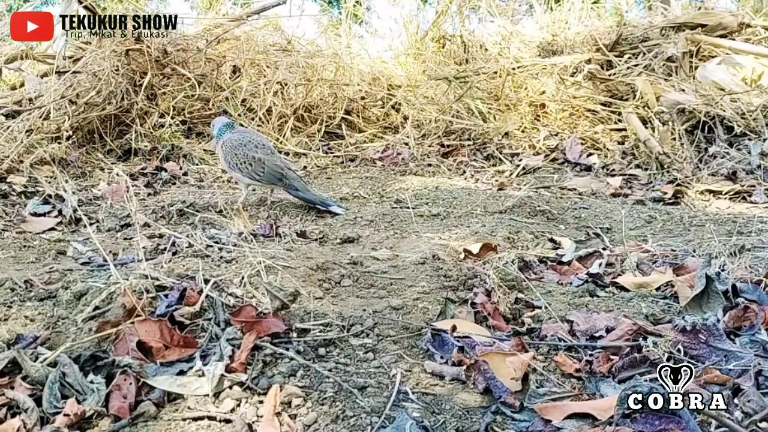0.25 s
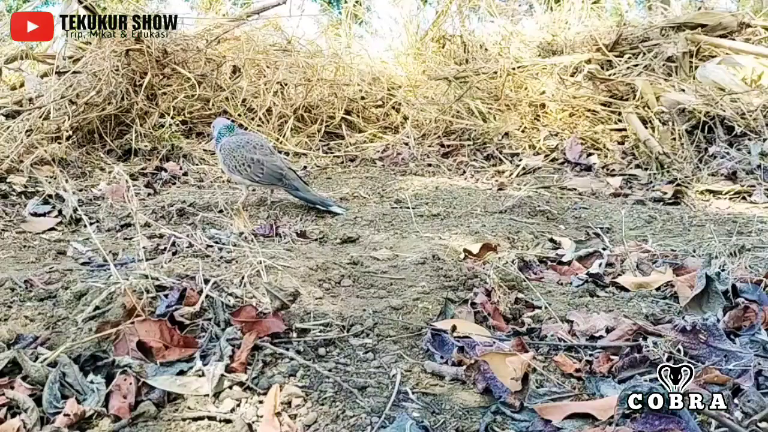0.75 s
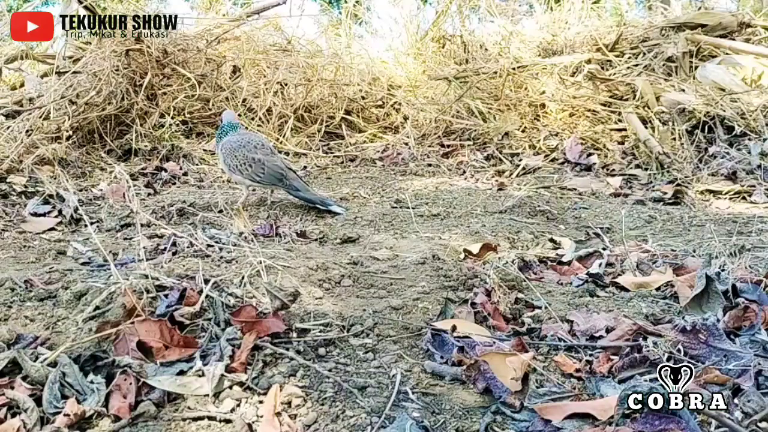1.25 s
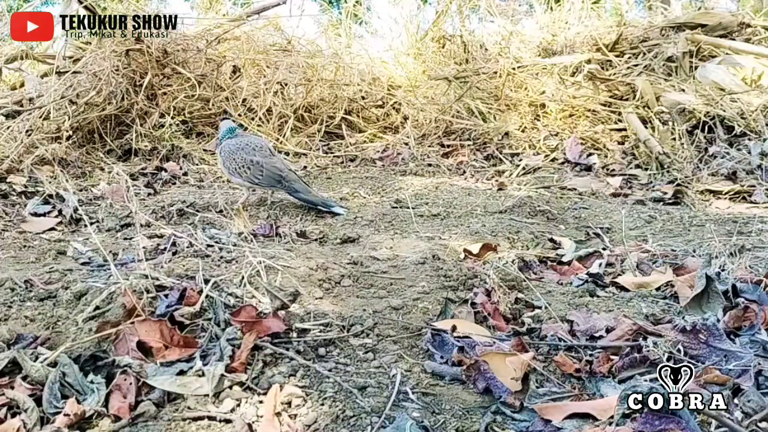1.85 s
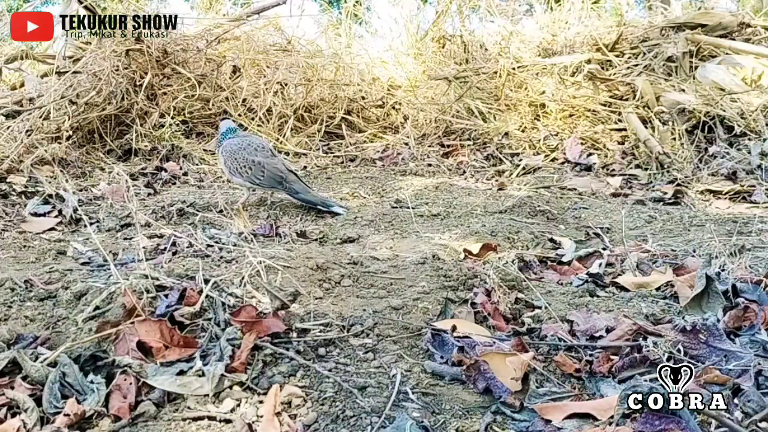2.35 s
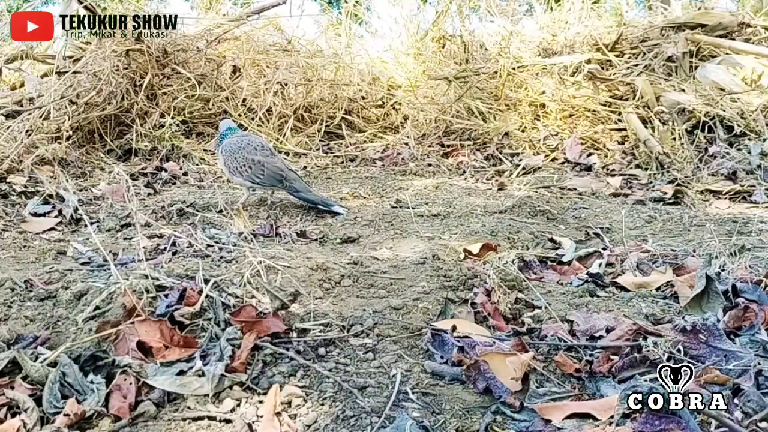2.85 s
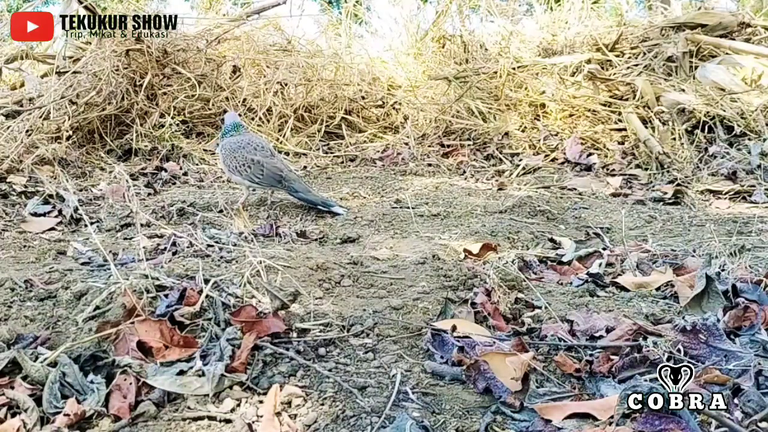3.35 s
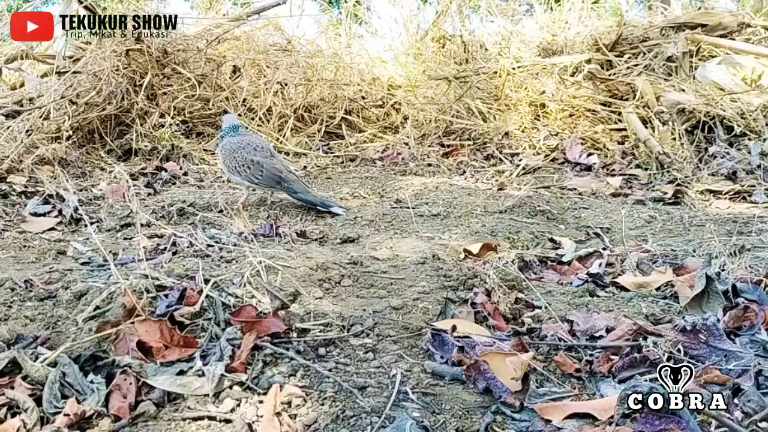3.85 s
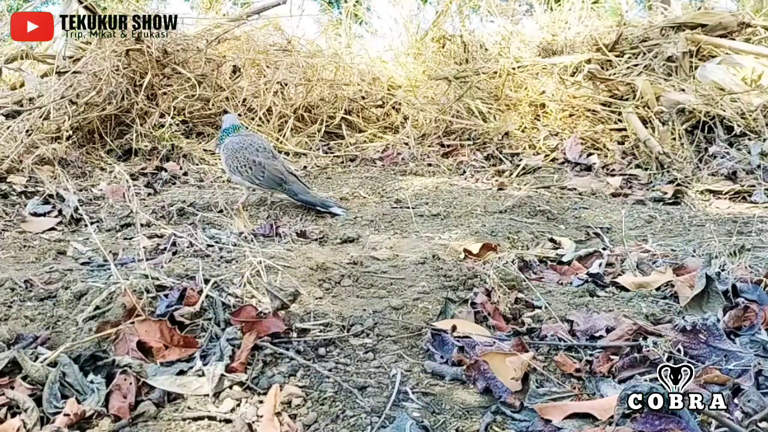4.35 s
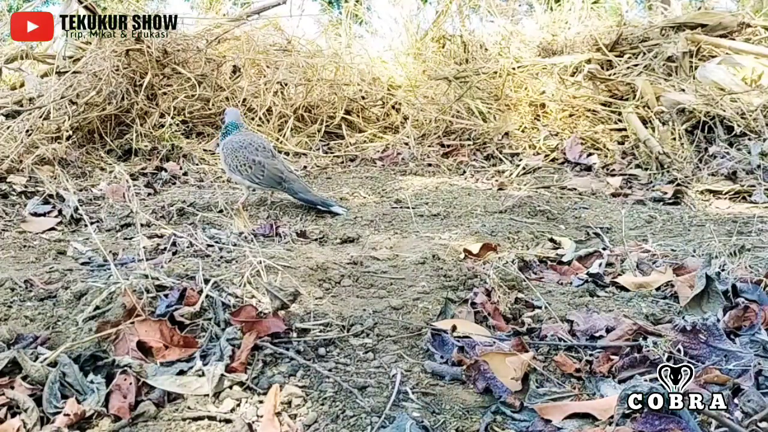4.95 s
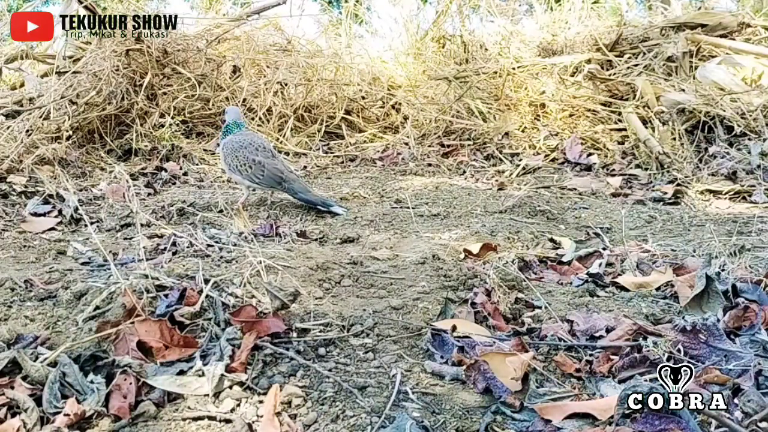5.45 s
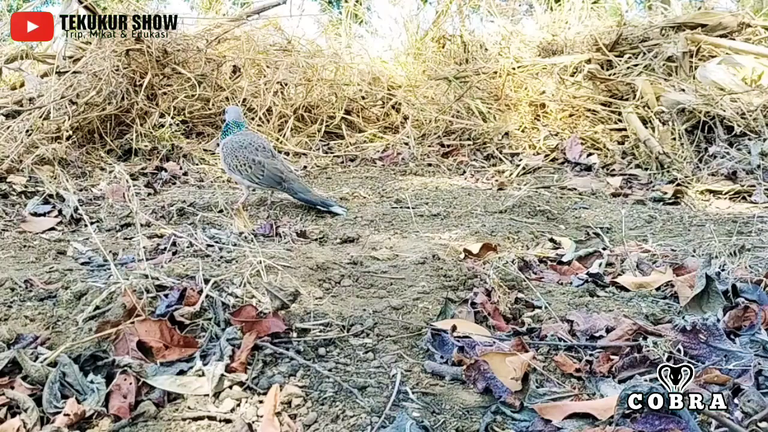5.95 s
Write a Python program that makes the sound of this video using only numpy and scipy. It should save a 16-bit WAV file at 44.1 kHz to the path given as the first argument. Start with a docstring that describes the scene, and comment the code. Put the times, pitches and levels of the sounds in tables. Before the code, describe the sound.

Low fluty dove coos chopped into rapid throaty pulses, close and clear, then a faint distant reply, among small leaf rustles and low outdoor hum.

```python
"""A dove sings three phrases of rattling coos; a second answers faintly from further off to the left.
Each coo is a low, nearly pure rotating tone, chopped into pulses by a valve in the throat.
In the long coos of the near bird the pulses quicken, then melt together as the pitch falls.
Dry leaves rustle and snap as noise grains and tiny ringing cracks; one tiny high pip sounds late.
Shaped noise and four wavering sines make a low outdoor rumble with hum, and noise a soft hiss of air."""
import sys
import numpy as np
from scipy import signal
from scipy.fft import rfft, irfft, next_fast_len
from scipy.io import wavfile
from scipy.ndimage import uniform_filter1d

SR = 44100
rng = np.random.default_rng(int(sys.argv[2]) if len(sys.argv) > 2 else 0)


def unload_audio(sound):
    """Save the sound as a 16-bit wav file, at the path given as the first command line argument."""
    columns = np.transpose(np.atleast_2d(sound))
    # keep every value between -1 and 1, then stretch to whole-number steps
    steps = np.round(np.clip(columns, -1, 1) * 32767)
    wavfile.write(sys.argv[1], SR, steps.astype(np.int16))


N = 273853

# Spectrum shape of the rumble: (frequency [Hz], density [dB per Hz])
RUMBLE_SPECTRUM = [(12, -22), (28, -3.5), (39, -1.5), (50, -3.5), (70, -0.5), (105, -3), (150, -7.5),
                   (230, -10.5), (310, -15.5), (390, -18.5), (600, -26), (900, -32.5), (1400, -48),
                   (4000, -96.5)]
# Spectrum shape of the open air: (frequency [Hz], density [dB per Hz])
AIR_SPECTRUM = [(560, -29.5), (950, -1), (1080, -9.5), (1190, -2.5), (1270, -5), (1630, -3), (1760, -6.5),
                (2390, -4), (3240, -4.5), (4930, -12.5), (6300, -14.5), (7690, -20), (15500, -19.5)]
# Slow swell of rumble and hum: (time [s], gain [dB])
SWELL = [(0, -1), (0.7, .5), (2.6, 1.6), (3.8, 1.2), (4.4, 0.4), (5.3, -2.5), (6.2, -1)]
# Distant hum, before waver and swell: (frequency [Hz], level [dB])
HUM = [(72, -58.5), (99.5, -59), (245, -62), (326, -63.5)]
# Likeness of the two channels: (frequency [Hz], correlation [0-1])
LIKENESS = [(30, .94), (300, .94), (700, .7), (1400, .1), (15000, .1)]
# Lean of the two channels: (frequency [Hz], left over right [dB])
LEAN = [(60, -1.3), (400, 1), (1300, -2.5), (2400, -4.5), (4400, -1), (8100, 1.5), (15000, 1)]

# Stirring of dry leaves, before the fizz and crackle gains:
# (centre time [s], level [dB], half length [s], middle pitch of the crackle [Hz])
RUSTLES = [(0.024, -51, 0.029, 2140), (0.2, -57.5, 0.028, 4050), (0.252, -51.5, 0.044, 3600),
           (0.342, -52, 0.029, 3830), (0.4, -57, 0.087, 3600), (0.52, -63.5, 0.16, 3160),
           (0.87, -65.5, .12, 3600), (1.21, -57.5, 0.046, 2370), (1.3, -60, 0.11, 2500),
           (1.93, -51, 0.084, 3700), (2.02, -51.5, .03, 3700), (2.08, -55.5, 0.11, 3580),
           (2.3, -58, 0.13, 3900), (2.46, -61.5, 0.13, 3680), (2.65, -59.5, 0.042, 3900),
           (2.8, -59, 0.12, 3760), (4.1, -61, 0.13, 3600), (4.315, -55.5, .03, 3400),
           (4.403, -56, 0.019, 3430)]
# Snaps of leaves and straw, before the snap gain: (time [s], level [dB])
SNAPS = [(0.288, -39), (0.350, -29.5), (0.353, -35), (0.561, -44), (1.907, -36.5), (1.945, -39),
         (2.019, -34.5), (2.022, -40), (2.296, -44), (2.852, -43), (4.278, -41), (4.372, -47), (5.876, -50)]
# Spectrum shape of rubbed dry leaves: (frequency [Hz], density [dB per Hz])
LEAF_SPECTRUM = [(300, -26.5), (1000, 6.5), (2400, 0), (3900, 1), (5300, -3), (8000, -11.5), (12000, -10.5),
                 (16000, -9)]
# Spectrum shape of the snaps: (frequency [Hz], density [dB per Hz])
SNAP_SPECTRUM = [(300, -28), (1200, 6), (2800, -8.5), (4300, 4), (7500, -17), (11000, -9), (16000, -14.5)]

# Broad passband of the swollen throat: (frequency [Hz], gain [dB])
THROAT = [(250, -31), (400, -3), (500, 1), (600, 0), (815, -1), (900, -7.5), (1050, 0.5), (1500, -4),
          (2500, -27)]
# Spectrum shape of the breathy rasp on each pulse: (frequency [Hz], density [dB per Hz])
RASP_SPECTRUM = [(500, -20), (950, -1.5), (1450, -4.5), (1900, -14), (3000, -32.5)]

# Note levels are before the throat; pitches are before each pulse bends them.
# Short, level purr: (bird, start [s], length [s], level [dB], pitch [Hz], pulse rate [1/s], pulse depth [0-1])
PURRS = [("far", 0.045, .13, -58.5, 660, 49, .9), ("near", 1.6445, .168, -23.3, 660, 94, .86),
         ("far", 3.81, .092, -44.5, 640, 62, .95)]
PURR_ATTACK_S, PURR_RELEASE_S = .012, .014

# Short coo that opens a phrase: (bird, start [s], time until the fade [s], peak level [dB], fade [dB/s],
# flutter level [dB], peak pitch [Hz], starting pulse rate [1/s])
OPENERS = [("near", 0.176, .054, -21.8, 560, -50, 658, 88),
           ("near", 3.367, .08, -22.8, 2400, -47.5, 645, 93),
           ("far", 4.936, .054, -43.3, 170, -55, 640, 84)]
OPENER_S, OPENER_ATTACK_S, OPENER_PEAK_S, OPENER_ARCH_S = .168, .018, .044, .028
OPENER_ARCH_SHARE, OPENER_ARCH_DB = .12, 4.5  # far from its peak the note is this much lower and softer
OPENER_SLOWING_PER_S2, OPENER_SLOWEST_PER_S, OPENER_DEEPEN_S = 290, 58, .058

# Coo that climbs, breaks into a clear whistle and drops: (bird, start [s], climb [s], whistle [s],
# pulse rate [1/s], level at the break [dB], at the top [dB], at the end [dB],
# pitch at the break [Hz], at the top [Hz], at the end [Hz])
RISERS = [("near", 0.343, .132, .082, 75.5, -22.7, -26, -14.5, 718, 815, 590),
          ("near", 3.5325, .131, .073, 75, -21.8, -24.5, -20, 700, 797, 530),
          ("far", 5.074, .102, .055, 84, -44, -40.5, -47, 655, 662, 590)]
RISER_FROM_HZ, RISER_BELOW_BREAK_DB, RISER_EASE_POWER = 535, -30, 2.3
RISER_DEPTH, BREAK_S, WHISTLE_CURVE_POWER, WHISTLE_RELEASE_S = 1, .005, 2.7, .012

# Long coo that falls at its end: (bird, start [s], length [s], release [s], level [dB], swell [dB],
# pitch [Hz], final drop [share], pulse rate at first [1/s], rate it tends to [1/s],
# time scale of quickening [s], pulse depth [0-1], time until the pulses melt [s], lift as they melt [dB])
TRILLS = [("near", 0.705, .542, .08, -24.2, 2.3, 714, .225, 48.9, 126, .56, 1, .437, 3.6),
          ("near", 1.915, .509, .028, -24.4, 3.5, 668, .06, 78.7, 121, .09, .86, .443, -4),
          ("far", 2.4234, .44, .13, -42.2, -4.5, 632, .01, 52.5, 76.6, .17, 1, .4, 0),
          ("near", 3.888, .543, .115, -23.8, 2.7, 704, .245, 47.6, 114, .577, 1, .402, 2.7),
          ("far", 5.381, .54, .12, -43, -2.5, 662, .06, 41.6, 60.6, .139, 1, .48, 0)]
TRILL_ATTACK_S, TRILL_SWELL_PEAK_SHARE = .017, .5  # the swell is complete at this share of the length
TRILL_SAG_SHARE, TRILL_DROP_S = .1, .047
TRILL_SHALLOWING_SHARE, MELT_S, MELT_DEPTH_SHARE, LIFT_S = .27, .008, .38, .034

SCOOP_SHARE, SCOOP_S = .16, .018  # trills and purrs slide up to pitch from this far below
EDGE_HZ = 15700


def gain_of(db):
    """Decibels to amplitude."""
    return 10 ** (np.asarray(db) / 20)


def evened(x):
    """Scales to rms 1."""
    return x / np.sqrt(np.mean(np.abs(x) ** 2) + 1e-20)


def read(points, hz):
    """Reads a table over log frequency."""
    f, value = np.transpose(points)
    return np.interp(np.log(hz + 1), np.log(f + 1), value)


def add(mix, start_s, sound):
    """Mixes a sound in; a start before zero is moved to zero."""
    part = mix[:, max(round(start_s * SR), 0):][:, :sound.shape[1]]
    part += sound[:, :part.shape[1]]


def wander(hz, size=N):
    """Random curve of rms about 1 that moves up to about hz times a second."""
    place = np.arange(size) * 2 * hz / SR
    knots = rng.standard_normal(int(place[-1]) + 2)
    # straight lines between knots lose a third of the power
    return np.sqrt(3 / 2) * np.interp(place, np.arange(len(knots)), knots)


def filtered(x, spectrum):
    """Applies a table of gains in dB."""
    size = next_fast_len(N, True)
    gains = gain_of(read(spectrum, np.fft.rfftfreq(size, 1 / SR)))
    return irfft(rfft(x, size) * gains, size)[:, :N]


def coloured(pair, spectrum, likeness, lead_s=0):
    """Gives two unrelated signals a spectrum, a likeness, a lean, and a lead of the left one."""
    size = next_fast_len(N, True)
    hz = np.fft.rfftfreq(size, 1 / SR)
    a, b = rfft(pair, size)
    same = np.clip(read(likeness, hz), -1, 1)
    lean = gain_of(read(LEAN, hz) / 2)
    right = (same * a + np.sqrt(1 - same ** 2) * b) * np.exp(-2j * np.pi * hz * lead_s)
    colour = evened(gain_of(read(spectrum, hz)))
    return irfft(np.array([a * lean, right / lean]) * colour, size)[:, :N]


def background(rumble_db=-44, air_db=-62.5, waver_hz=2.0, waver_db=4.0):
    """Distant rumble as low noise, hum as sines of wavering pitch and level, open air as steady hiss."""
    t = np.arange(N) / SR
    rumble = gain_of(rumble_db) * coloured(rng.standard_normal((2, N)), RUMBLE_SPECTRUM, LIKENESS)
    hum = np.zeros(N)
    for hz, db in HUM:
        turns = np.cumsum(hz + waver_hz * wander(4)) / SR
        hum += gain_of(db + waver_db * wander(9)) * np.sin(2 * np.pi * turns)
    air = gain_of(air_db) * coloured(rng.standard_normal((2, N)), AIR_SPECTRUM, LIKENESS)
    swell = gain_of(np.interp(t, *np.transpose(SWELL)))
    return (rumble + hum) * swell + air


def crackle(half_s, hz, per_s, spread, ring_s, grain_db):
    """A clump of tiny cracks, each ringing its own scrap of leaf."""
    count = int(per_s * half_s) + 3
    when, pitch, size, sign = rng.standard_normal((count, 4)).T
    t = np.arange(200) / SR
    pitch_hz = hz * np.exp(spread * pitch)[:, None]
    rings = np.sin(2 * np.pi * pitch_hz * t) * np.exp(-t / ring_s)
    rings *= gain_of(grain_db * np.minimum(size, 2))[:, None] * np.sign(sign)[:, None]
    # cracks crowd around the centre of the clump
    starts = ((1 + np.tanh(when / 2) / 2) * half_s * SR).astype(int)
    sound = np.bincount((starts[:, None] + np.arange(len(t))).ravel(), rings.ravel())
    return sound * np.sqrt(half_s * SR / np.sum(sound ** 2))


def leaves(fizz_db=-2, crackle_db=-9, snap_decay_s=.0011, snap_db=-2, grain_db=4.5, grains_per_s=1100):
    """Stirred leaves fizz in sparse grains and crackle; snaps are short decaying bursts of noise."""
    power, bursts = np.zeros((2, 1, N))
    cracks = np.zeros((2, N))
    for centre_s, db, half_s, hz in RUSTLES:
        hump = np.hanning(int(2 * half_s * SR))[None] ** 4
        add(power, centre_s - half_s, gain_of(db + fizz_db) ** 2 * hump)
        for side in np.eye(2):
            clump = crackle(half_s, hz, per_s=220, spread=.22, ring_s=.0006, grain_db=4)
            add(cracks, centre_s - half_s, gain_of(db + crackle_db) * side[:, None] * clump)
    decay = np.exp(-np.arange(SR // 50)[None] / SR / snap_decay_s)
    for start_s, db in SNAPS:
        add(bursts, start_s, gain_of(db + snap_db) * decay)
    sizes = gain_of(grain_db * np.minimum(rng.exponential(1, (2, N)), 4))
    present = rng.random((2, N)) < grains_per_s / SR
    fizz = evened(sizes * rng.choice([-1, 1], (2, N)) * present)
    likeness, lead_s = [(1000, .5)], .00031  # one likeness at all frequencies
    rustle = coloured(fizz * np.sqrt(power) + cracks, LEAF_SPECTRUM, likeness, lead_s)
    snaps = coloured(bursts * rng.standard_normal((2, N)), SNAP_SPECTRUM, likeness, lead_s)
    return rustle + snaps


def envelope(t, attack_s, release_s):
    """Straight attack, hold and straight release."""
    return np.minimum(t / attack_s, 1) * np.minimum((t[-1] - t) / release_s, 1)


def scoop(t):
    """Share of its full pitch that a note has reached."""
    return 1 - SCOOP_SHARE * np.exp(-(t / SCOOP_S) ** 2)


def purr(length_s, db, hz, rate_per_s, depth):
    """Even pulses that slide up to one pitch and stay there."""
    t = np.arange(0, length_s, 1 / SR)
    level = gain_of(db) * envelope(t, PURR_ATTACK_S, PURR_RELEASE_S)
    return t, level, hz * scoop(t), np.full(len(t), rate_per_s), np.full(len(t), depth)


def opener(hold_s, db, fade_db_per_s, flutter_db, hz, rate_per_s):
    """A smooth little arch that breaks up into slowing pulses and sinks to a faint flutter."""
    t = np.arange(0, OPENER_S, 1 / SR)
    off_peak = 1 - np.exp(-((t - OPENER_PEAK_S) / OPENER_ARCH_S) ** 2)
    fade_db = fade_db_per_s * np.maximum(t - hold_s, 0)
    level_db = np.maximum(db - OPENER_ARCH_DB * off_peak - fade_db, flutter_db)
    level = np.minimum(t / OPENER_ATTACK_S, 1) ** 1.5 * gain_of(level_db)
    pitch_hz = hz * (1 - OPENER_ARCH_SHARE * off_peak)
    pulses_per_s = np.maximum(rate_per_s - OPENER_SLOWING_PER_S2 * t, OPENER_SLOWEST_PER_S)
    return t, level, pitch_hz, pulses_per_s, (t / OPENER_DEEPEN_S) ** 2


def riser(climb_s, whistle_s, rate_per_s, break_db, top_db, end_db, break_hz, top_hz, end_hz):
    """Pulses grow and climb; the valve then stays open and the whistle curves down."""
    t = np.arange(0, climb_s + whistle_s, 1 / SR)
    to_go = np.maximum(1 - t / climb_s, 0)
    fall = np.maximum((t - climb_s) / whistle_s, 0) ** WHISTLE_CURVE_POWER
    clear = .5 + .5 * np.tanh((t - climb_s) / BREAK_S)
    climb_db = break_db + RISER_BELOW_BREAK_DB * to_go ** RISER_EASE_POWER
    whistle_db = top_db + (end_db - top_db) * fall
    climb_hz = break_hz + (RISER_FROM_HZ - break_hz) * to_go
    whistle_hz = top_hz + (end_hz - top_hz) * fall
    level = gain_of((1 - clear) * climb_db + clear * whistle_db)
    level *= np.minimum((t[-1] - t) / WHISTLE_RELEASE_S, 1)
    pitch_hz = (1 - clear) * climb_hz + clear * whistle_hz
    return t, level, pitch_hz, np.full(len(t), rate_per_s), RISER_DEPTH * (1 - clear)


def trill(length_s, release_s, db, swell_db, hz, drop, first_per_s, last_per_s, quicken_s,
          depth, melt_at_s, lift_db):
    """Pulses quicken and melt together while the pitch sags, then drops as the air runs out."""
    t = np.arange(0, length_s, 1 / SR)
    spent = t / length_s
    melted = .5 + .5 * np.tanh((t - melt_at_s) / MELT_S)
    swell = swell_db * np.minimum(spent / TRILL_SWELL_PEAK_SHARE, 1) ** 1.5
    lift = lift_db * np.exp(-((t - melt_at_s) / LIFT_S - .5) ** 2)
    level = envelope(t, TRILL_ATTACK_S, release_s) * gain_of(db + swell + lift)
    final_drop = drop * np.exp((t - length_s) / TRILL_DROP_S)
    pitch_hz = hz * (scoop(t) - TRILL_SAG_SHARE * spent ** 2 - final_drop)
    pulses_per_s = last_per_s + (first_per_s - last_per_s) * np.exp(-(t / quicken_s) ** 2)
    shallowing = 1 - TRILL_SHALLOWING_SHARE * spent ** 2
    return t, level, pitch_hz, pulses_per_s, depth * shallowing * (1 - melted * (1 - MELT_DEPTH_SHARE))


def song(bird):
    """One bird's notes: start, and the course of (time, amplitude, pitch, pulse rate, pulse depth)."""
    notes = []
    for shape, table in [(purr, PURRS), (opener, OPENERS), (riser, RISERS), (trill, TRILLS)]:
        notes += [(start_s, shape(*row)) for who, start_s, *row in table if who == bird]
    return notes


def coo(note, open_s, duty, bend, rise, slip, jitter, uneven_db, overtone_db, flutter):
    """One note as a rotating tone, chopped by a valve in the throat."""
    t, level, hz, rate_per_s, depth = note
    depth = np.clip(depth, 0, 1)
    rate_per_s = np.maximum(rate_per_s, 20)
    # quick pulses come less evenly than slow ones
    unevenness = jitter * (rate_per_s / 100) ** 2 * wander(25, len(t))
    beats = np.maximum(np.cumsum(rate_per_s) / SR + unevenness, 0)
    # the valve stays open a fixed time, up to a share of the cycle: slow pulses stand apart, quick ones touch
    width = np.minimum(open_s * rate_per_s, duty)
    place = (beats % 1 - .5) / width
    shut = np.exp(-(.5 / width) ** 2)
    gate = (np.exp(-place ** 2) - shut) / (1 - shut)
    # pitch arches with each opening, and climbs through the deep pulses
    arch = bend * (gate - .75) + rise * depth ** 2 * np.tanh(place)
    turns = np.cumsum(hz * (1 + depth * arch + flutter * wander(200, len(t)))) / SR
    # each pulse starts out of step with the last; where they overlap they partly cancel
    pulse = np.arange(120)
    slips = slip * rng.uniform(-1.2, 1, len(pulse)) * np.interp(pulse - 1, beats, depth)
    steps = np.exp(2j * np.pi * np.cumsum(slips))
    before = (beats + .5).astype(int)
    handover = .5 + .5 * np.tanh(7 * ((beats + .5) % 1 - .5))
    phase = steps[before] * (1 - handover) + steps[before + 1] * handover
    swing = (1 - depth + depth * gate) * phase
    swing /= np.sqrt(uniform_filter1d(abs(swing) ** 2, size=1800))  # evens the level over about 40 ms
    tone = swing * gain_of(uneven_db * wander(45, len(t))) * np.exp(2j * np.pi * turns)
    fade = np.clip(np.minimum(t, t[-1] - t) / .0035, 0, 1)
    # squaring the rotating tone gives its octave
    return np.sqrt(2) * level * fade * (tone + gain_of(overtone_db) * tone ** 2)


def at_microphones(tone, lean_db, lead_rad):
    """A direction: left over right in dB, and the left one leads in phase."""
    side = gain_of(lean_db / 2) * np.exp(.5j * lead_rad)
    pair = np.array([[side], [1 / side]])
    return (pair / abs(pair.mean()) * tone).real


def yard(x, echo_s, echo_db, scatter_db, t60_s):
    """One near reflection and a thin scatter from brush and trees."""
    t = np.arange(SR // 2) / SR
    taps = rng.standard_normal((2, len(t))) * gain_of(-60 * t / t60_s) * (t > .012)
    taps *= gain_of(scatter_db) / np.linalg.norm(taps[0])
    delayed = np.array([np.interp(np.arange(N) - echo_s * SR, np.arange(N), c) for c in x])
    scatter = signal.fftconvolve(x, taps, axes=1)[:, :N]
    return x + gain_of(echo_db) * delayed + scatter


def far_dove():
    """The answering bird: faint pulsed tones through the throat band, louder on the left, more scatter."""
    out = np.zeros((2, N))
    valve = dict(open_s=.0052, duty=.4, bend=.16, rise=.01, slip=.5, jitter=.11, uneven_db=.7, flutter=.014)
    for start_s, note in song("far"):
        tone = coo(note, overtone_db=-44.5, **valve)
        add(out, start_s, at_microphones(tone, lean_db=2.2, lead_rad=1.0))
    return yard(filtered(out, THROAT), echo_s=.007, echo_db=-22, scatter_db=-16, t60_s=.3)


def near_dove(rasp_db=-45):
    """The close bird, louder on the right: pulsed tones through the throat band, with a breathy rasp."""
    out = np.zeros((2, N))
    valve = dict(open_s=.0042, duty=.4, bend=.13, rise=.08, slip=.5, jitter=.095, uneven_db=.6, flutter=.009)
    for start_s, note in song("near"):
        tone = coo(note, overtone_db=-49, **valve)
        add(out, start_s, at_microphones(tone, lean_db=-4.5, lead_rad=1.05))
    # the rasp follows the tone's smoothed (rms) amplitude
    amplitude = np.sqrt(np.abs(uniform_filter1d(out ** 2, size=130)))
    breath = amplitude * rng.standard_normal((2, N))
    rasp = gain_of(rasp_db) * coloured(breath, RASP_SPECTRUM, LIKENESS)
    return yard(filtered(out, THROAT) + rasp, echo_s=.0105, echo_db=-22, scatter_db=-27, t60_s=.25)


def pip(centre_s=5.877, hz=6500, db=-50, width_s=.0009):
    """One tiny high pip: a sine of a few cycles under a bell curve."""
    t = np.arange(N) / SR - centre_s
    return gain_of(db) * np.exp(-(t / width_s) ** 2) * np.sin(2 * np.pi * hz * t)


def scene():
    """Both doves, the leaves, the pip and the surroundings."""
    return background() + leaves() + far_dove() + near_dove() + pip()


def record(dry):
    """Band limit: a steep low-pass at EDGE_HZ."""
    lowpass = signal.firwin(511, EDGE_HZ, window=("kaiser", 9), fs=SR)
    return signal.oaconvolve(dry, lowpass[None], "same")


dry = scene()
out = record(dry)
unload_audio(out)
```